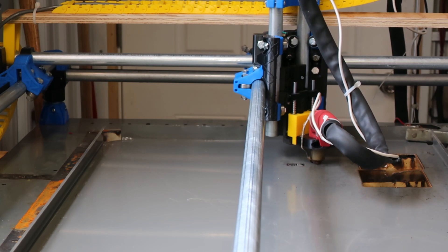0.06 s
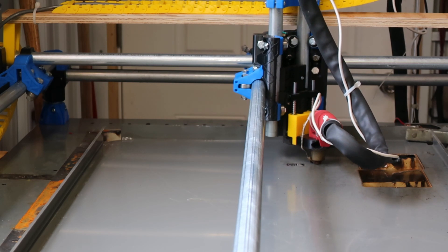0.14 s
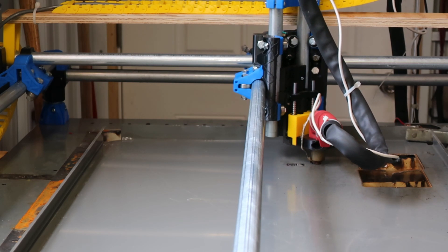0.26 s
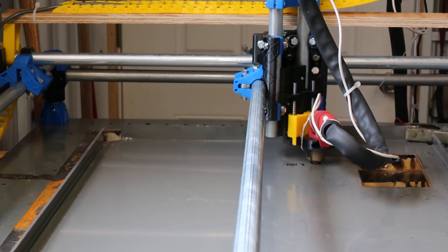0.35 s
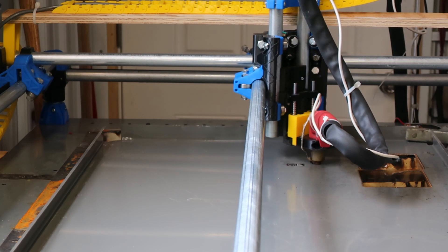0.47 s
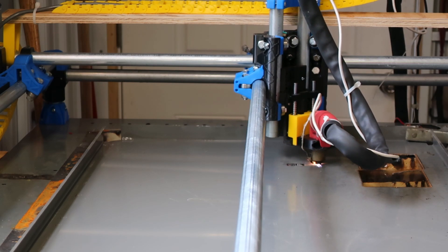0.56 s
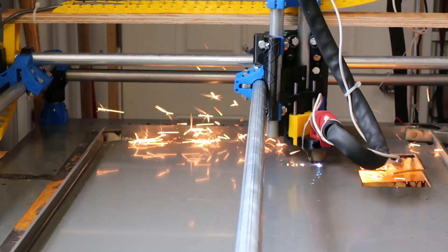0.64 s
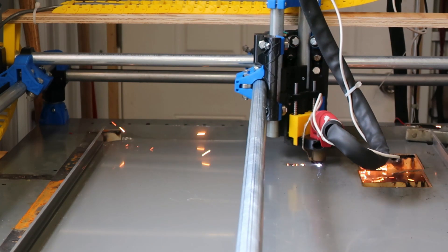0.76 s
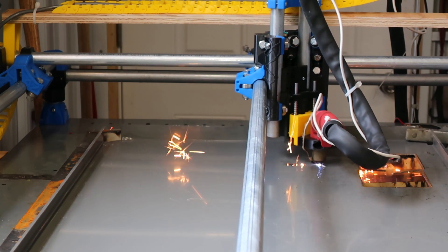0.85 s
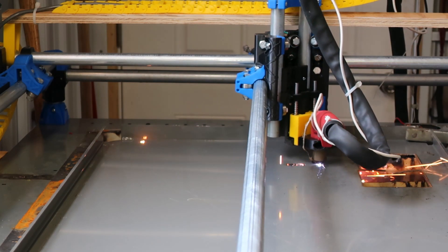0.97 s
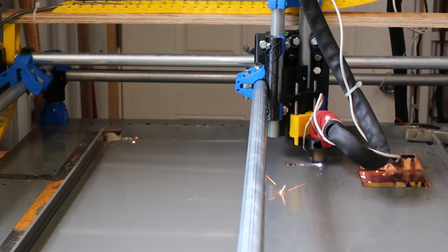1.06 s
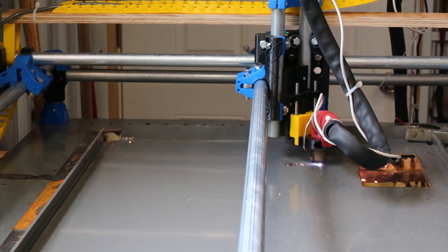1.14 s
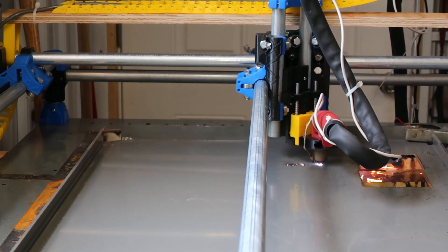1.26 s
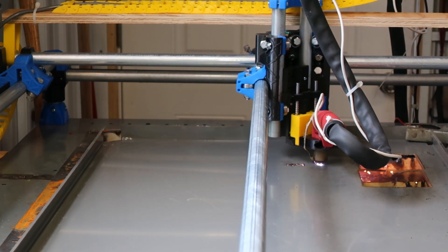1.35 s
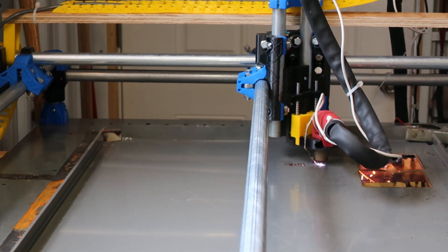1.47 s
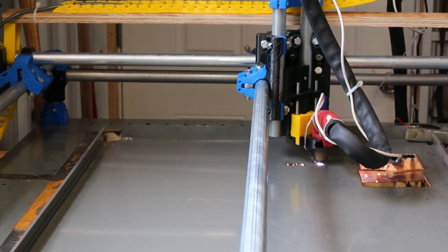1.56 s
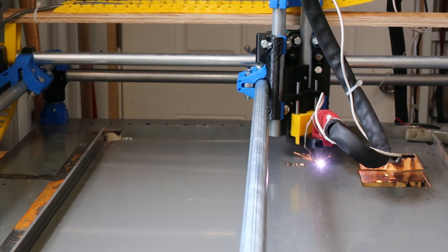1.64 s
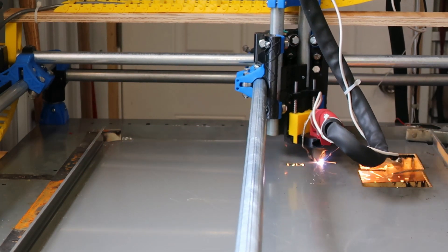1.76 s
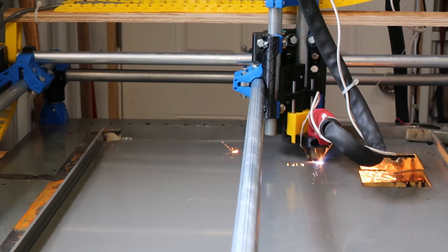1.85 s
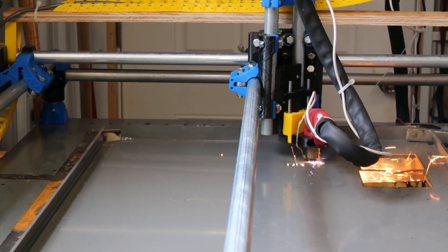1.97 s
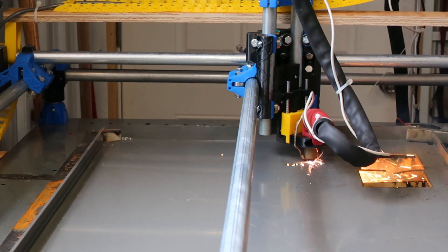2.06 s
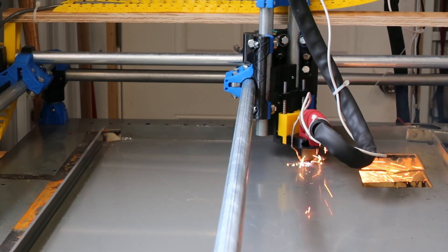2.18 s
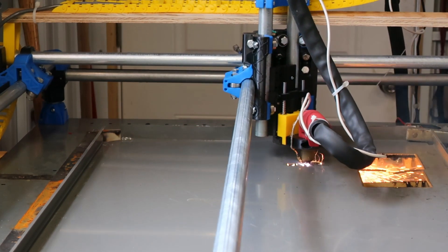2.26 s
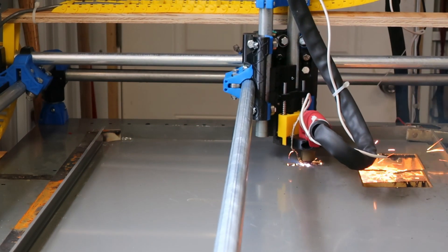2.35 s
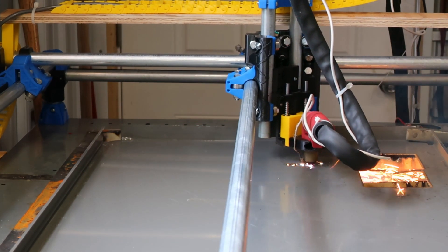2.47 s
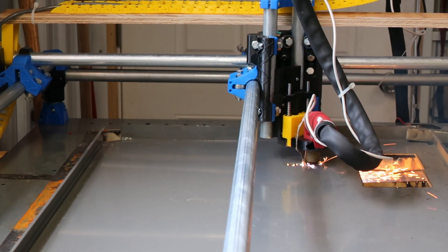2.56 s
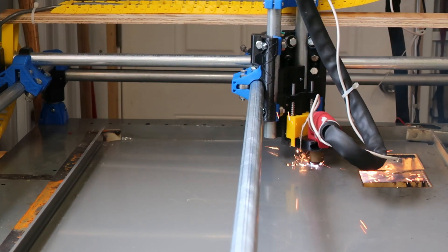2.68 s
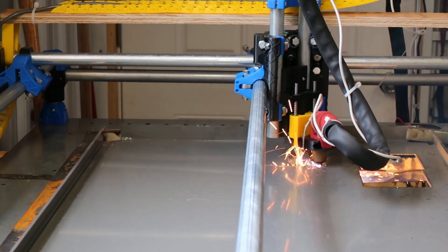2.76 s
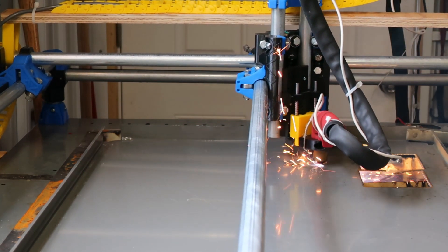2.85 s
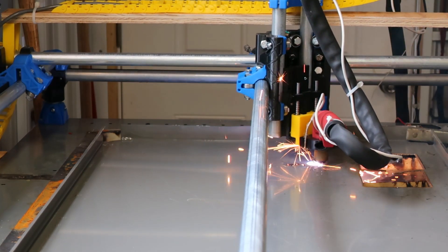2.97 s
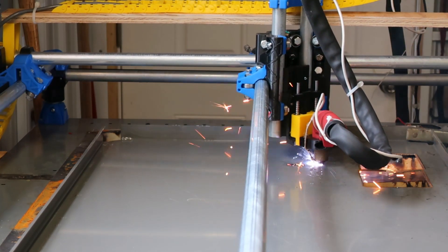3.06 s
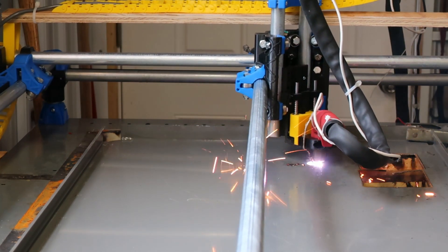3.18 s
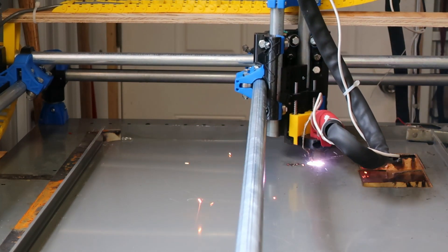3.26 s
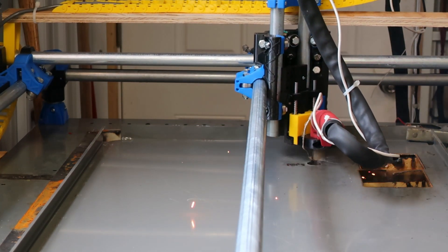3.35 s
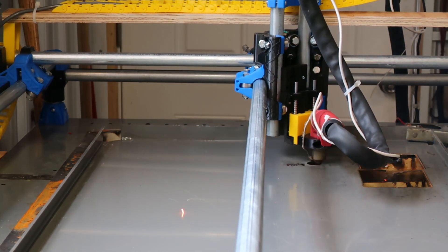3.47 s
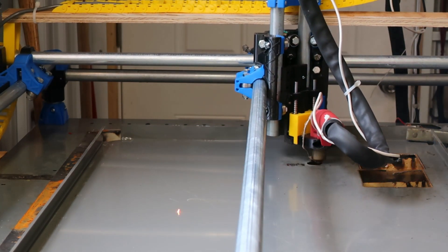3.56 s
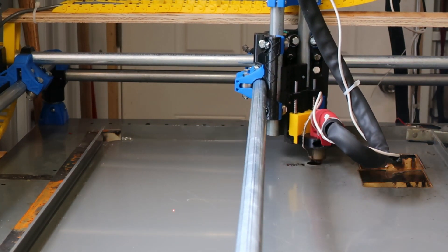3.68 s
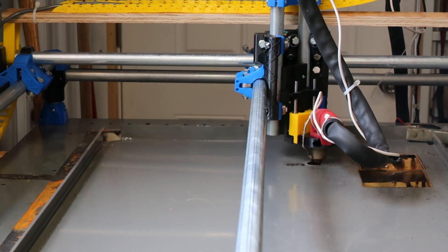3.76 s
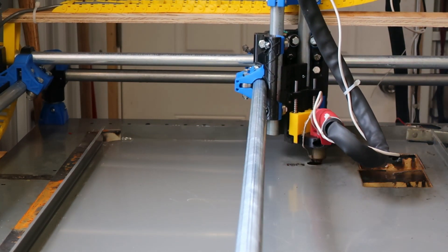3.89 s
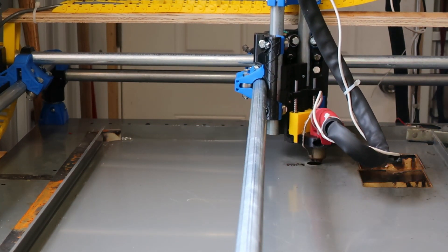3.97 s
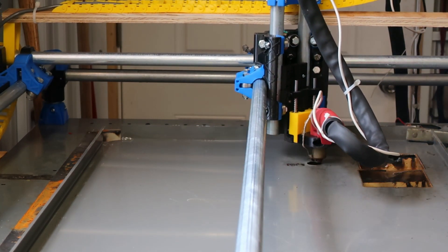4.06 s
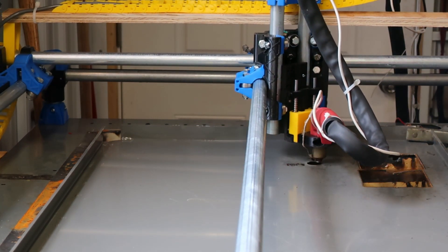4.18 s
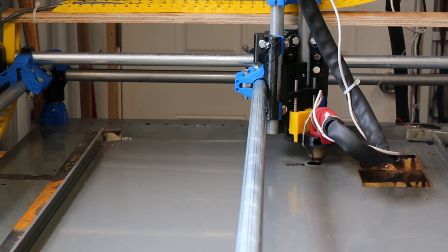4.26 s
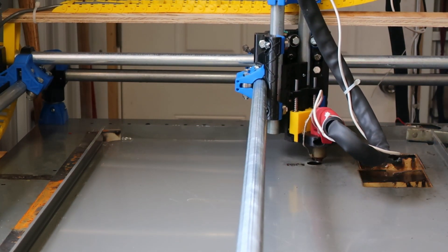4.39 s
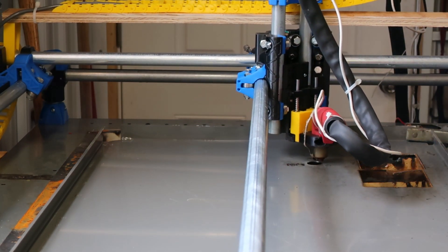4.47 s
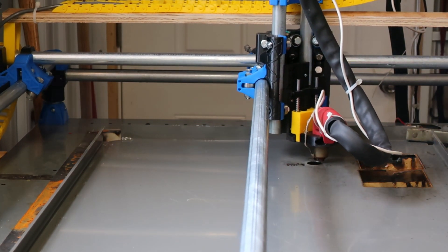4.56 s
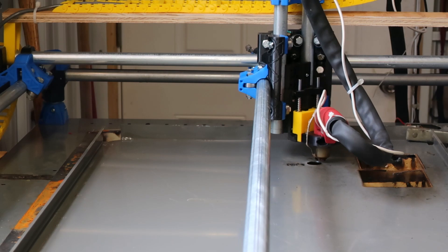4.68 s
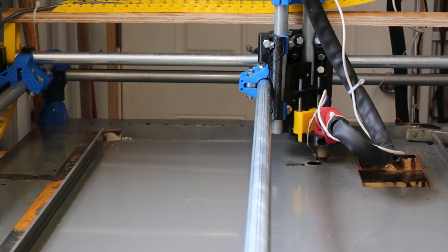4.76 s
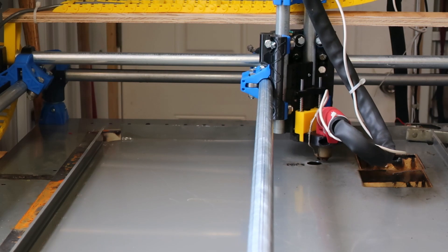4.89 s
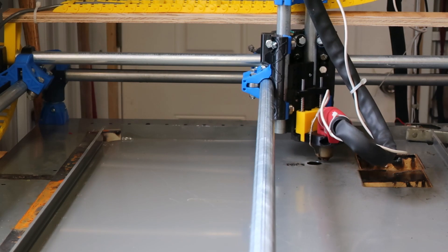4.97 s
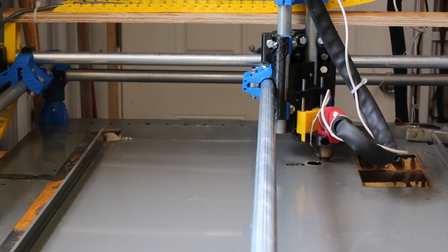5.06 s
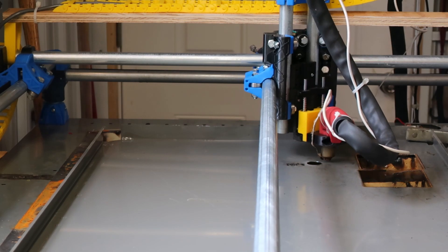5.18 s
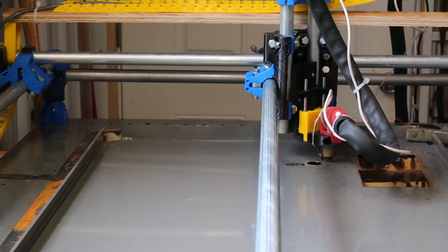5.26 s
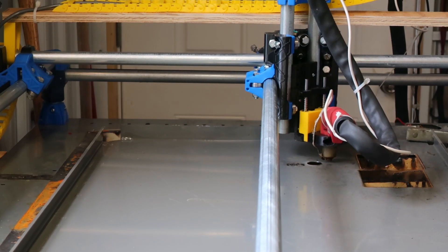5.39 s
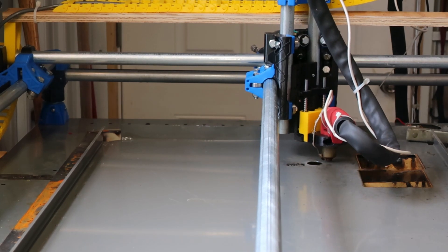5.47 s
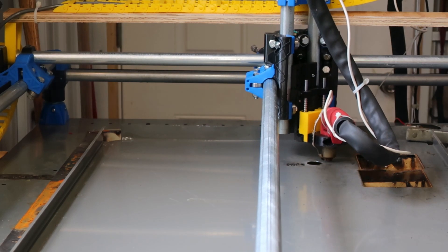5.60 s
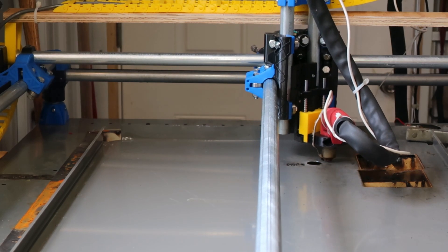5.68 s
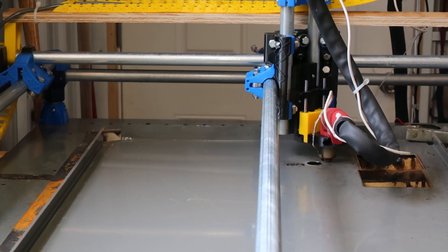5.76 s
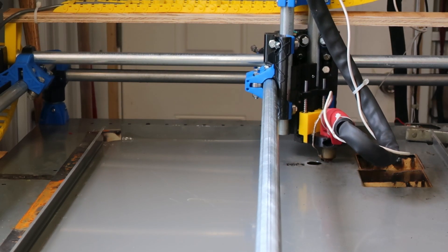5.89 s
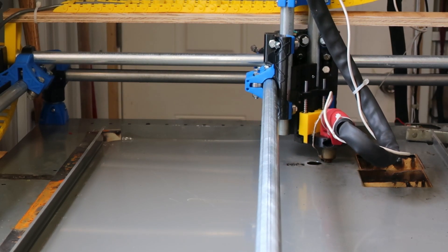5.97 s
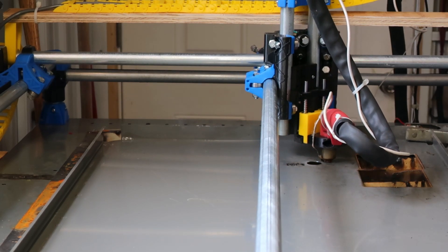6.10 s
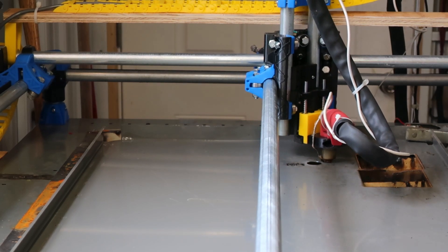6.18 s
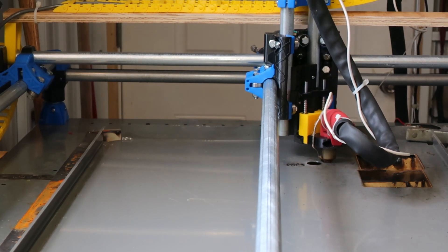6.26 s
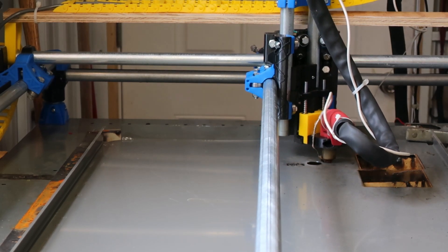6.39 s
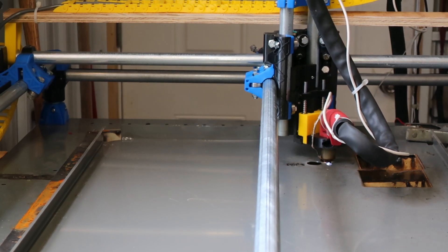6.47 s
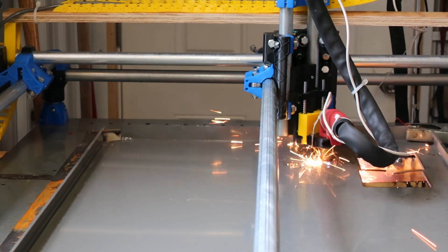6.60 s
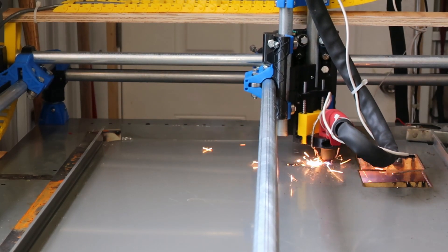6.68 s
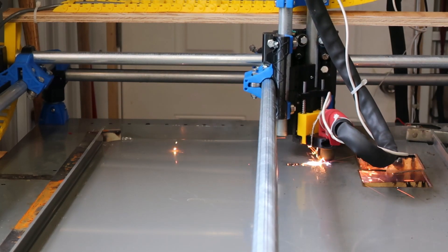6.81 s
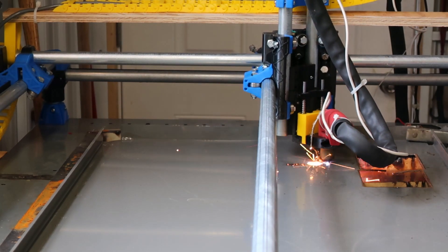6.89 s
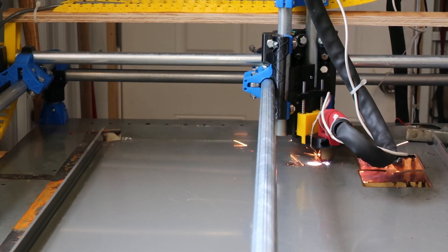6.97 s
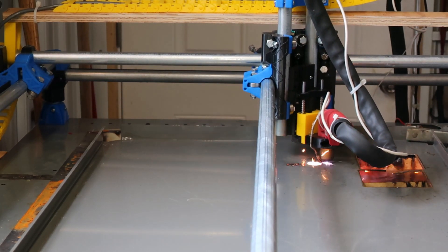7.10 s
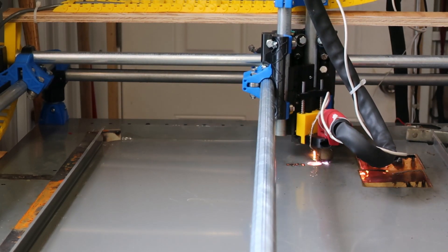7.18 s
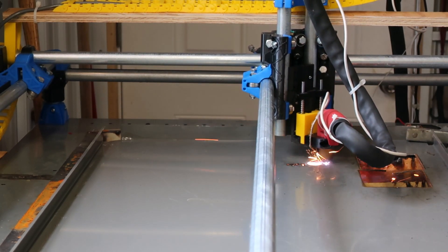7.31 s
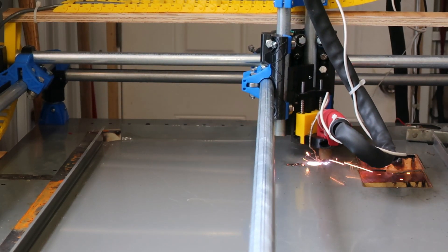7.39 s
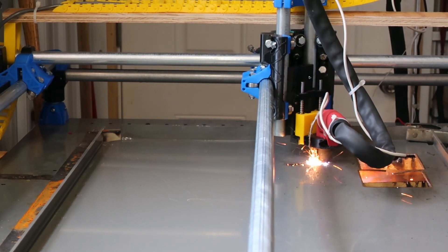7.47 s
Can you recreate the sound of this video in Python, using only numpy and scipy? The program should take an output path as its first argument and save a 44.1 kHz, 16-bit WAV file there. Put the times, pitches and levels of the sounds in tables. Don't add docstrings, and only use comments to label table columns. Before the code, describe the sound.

Close stereo pickup, about a metre from a plasma cutter over a metal tray. First comes airy hiss with a faint whistle, then a ticking spark burst and a loud, wide, uneven roar that rattles the sheet and sprays fizzing metal. The arc cuts out suddenly, leaving subdued air that gradually grows louder with shifting whistles and low sheet rumble. Another strike brings a second, shorter roar. Small room, little bass.

```python
import sys
import numpy as np
from scipy import signal
from scipy.fft import rfft, irfft, next_fast_len
from scipy.io import wavfile
from scipy.ndimage import uniform_filter1d

SR = 44100
rng = np.random.default_rng(int(sys.argv[2]) if len(sys.argv) > 2 else 0)


def dump_mix(stems):
    frames = np.atleast_2d(stems).T
    limited = np.clip(frames, -1, 1)
    pcm = np.round(limited * 32767).astype(np.int16)
    wavfile.write(sys.argv[1], SR, pcm)


def attenuation_scalar(level_db):
    decades = np.asarray(level_db, float) / 20
    return 10 ** decades


N = 332514
HOP = 128

# frequency [Hz], level [dB per Hz].
SHOP_SPECTRUM = [(50, -40), (100, -49), (200, -13), (330, -7.5), (450, -2), (600, -6), (800, -5.5),
                 (1300, -4.5), (1900, -42.5)]
# frequency [Hz], level [dB per Hz].
SHEET_SPECTRUM = [(50, -62), (100, -77), (200, -20.5), (330, -7.5), (400, -6), (560, -5), (700, -6),
                  (1030, -4.5), (1400, -8), (1900, -25)]
# frequency [Hz], level [dB per Hz].
SPRAY_SPECTRUM = [(2600, -30), (3300, 0.5), (3700, 2), (4200, -1), (4700, -0.5), (5400, -1.5),
                  (6500, -10.5), (8000, -17)]
# frequency [Hz], level [dB per Hz].
HISS_SPECTRUM = [(3500, -14.5), (6000, -1.5), (8700, -1.5), (12700, -1), (14000, -5.5), (15000, -1.5),
                 (15500, -10), (15900, -30)]
# frequency [Hz], side minus mid [dB].
PORT_DIFFERENCE = [(60, -10), (130, -23), (300, -19.5), (1300, -21.5), (2400, -16), (3500, -10.5),
                   (4700, -5), (6500, -1), (9000, 2.5), (10000, 5), (11500, 3), (13000, 7.5), (14500, 1),
                   (15700, 5)]
# frequency [Hz], width [Hz], lift [dB].
TRAY_MODES = [(248, 31, 4), (388, 85, 6.5), (484, 16, 3), (570, 50, -2), (680, 45, 7), (733, 21, 6.5),
              (791, 27, 1.5), (863, 30, 7), (910, 17, 6), (962, 25, -3), (1031, 24, 5.5), (1058, 40, 3.5),
              (1114, 23, 1.5), (1148, 20, -3), (1170, 19, 3.5), (1215, 22, 2.5), (1265, 60, 5.5),
              (1346, 54, 3.5), (1410, 35, -2.5), (1502, 18, 5.5), (1558, 42, 6), (1605, 23, 3),
              (1760, 70, 3.5), (1847, 26, 2.5), (1895, 26, 2.5), (2000, 50, -2.5), (2089, 35, 5),
              (2168, 25, 4.5), (2234, 50, 5), (2326, 28, 1), (2422, 29, 1), (2471, 42, 5), (2536, 17, 2),
              (2638, 29, 4), (2778, 27, 3.5), (2895, 55, 4), (3052, 28, 2), (3122, 36, 3), (3187, 44, 2),
              (3316, 33, 1.5), (3478, 60, 2.5), (3635, 35, 2), (4095, 50, 1.5), (4689, 52, 2.5),
              (5440, 60, 2.5), (5905, 70, 2), (6089, 58, 3)]
# frequency [Hz], width [Hz], lift in air alone [dB],
# lift with the arc lit [dB].
JET_RIDGES = [(1490, 160, 0, -2), (2200, 1100, 0.5, -3), (3220, 140, 2.5, -4), (3520, 200, -0.5, -3.5),
              (4210, 400, 2.5, 1.5), (5050, 590, 1, -1), (7800, 220, 1.5, -1), (9730, 210, 9, 4),
              (10400, 170, -0.5, 3), (12550, 110, -1.5, 4.5), (13900, 300, -2, 1)]
# strike [s], snap-off [s].
ARC_ON = [
    (.648, 3.44),
    (6.578, 7.6),
]
# start [s], peak [dB], pitch [Hz].
STRIKE_SPARKS = [
    (.6482, -10, 4400),
    (.6519, -15, 3300),
    (.6562, -15, 2400),
    (.6603, -18, 3200),
    (.6637, -20, 2600),
    (.6681, -18, 1900),
    (.6738, -18, 3000),
    (.6752, -19, 3100),
]
# start [s], peak [dB], pitch [Hz].
RESTRIKE_SPARKS = [
    (6.5797, -14, 4200),
    (6.5886, -12, 3600),
    (6.593, -17, 2300),
    (6.597, -17, 1500),
    (6.6057, -17, 2200),
    (6.6158, -17, 3300),
    (6.617, -13, 4300),
]
# start [s], peak [dB], pitch [Hz], ring time [s].
BLOW_THROUGHS = [(.98, -20, 723, 0.023), (.986, -17, 900, .008), (1.048, -17, 960, 0.0055),
                 (1.061, -13, 1100, 0.006), (.974, -17, 1265, .012), (1.004, -19, 950, .01),
                 (1.02, -19, 1250, .006), (.912, -21, 735, .015), (1.093, -21, 2500, .006),
                 (1.045, -21, 2950, .004), (1.082, -14, 1200, 0.006), (1.105, -16, 1060, 0.006),
                 (1.122, -21, 2460, 0.013), (1.26, -27.5, 389, 0.025), (1.466, -32, 396, 0.038),
                 (1.544, -33, 386, 0.04), (1.596, -23, 384, 0.012), (1.745, -27.5, 402, 0.042),
                 (3.334, -14.5, 1047, .006), (3.432, -21, 694, 0.0075), (3.429, -19, 1050, .007),
                 (6.755, -19, 1520, .012), (7.15, -20, 1200, .008), (7.195, -21, 1260, .01),
                 (3.433, -23, 380, 0.009), (6.597, -23.5, 865, 0.022), (6.577, -21, 2450, .006),
                 (6.589, -19, 2450, .006), (6.604, -19, 2150, .006), (6.647, -22, 2200, .006),
                 (6.63, -23, 3250, .005), (6.619, -22, 3400, .004), (6.6, -38, 253, 0.032),
                 (7.16, -19, 1157, 0.013), (7.4, -22, 1033, 0.022), (7.467, -18, 1093, 0.0092)]
# time [s], level over the hiss [dB].
SLOT_SINGING = [(.7, -8), (.95, 4), (1.6, 6), (1.75, -6), (2.95, -3.5), (3.1, 4), (3.43, 6), (3.46, -12),
                (6.8, -13), (6.95, -1), (7.54, 2)]
# time [s], jet striking the sheet over the hiss [dB],
# gap resonance [Hz].
NOZZLE_GAP = [(0, -4, 3030), (.366, -8.5, 2760), (.63, -9.5, 3000), (3.6, 0.5, 2160), (3.95, 2.5, 2240),
              (4.36, 4.5, 2220), (4.71, 6.8, 2140), (5.03, 0.5, 2500), (5.24, -1.6, 2750),
              (5.8, -2.5, 2900), (6.0, -3, 2740), (6.24, -8.5, 2840), (6.44, -10, 2850), (6.57, -7.5, 3000)]
# time [s], kerf resonance [Hz], spatter over the roar [dB],
# sheet shake over the roar [dB].
CUTS = [
    [(.66, 2400, -2.5, -5), (.87, 2280, -4, -3.5), (1.02, 1740, -6.5, -5.5), (1.2, 2200, -6.5, -0.5),
     (1.4, 1900, -9, -4), (1.8, 2250, -12.5, -3.5), (2.3, 2180, -6.5, -6), (2.9, 1880, -4, -6),
     (3.04, 2800, -5.5, -8.5)],
    [(3.27, 1720, -4.5, -3), (3.5, 1680, -8.5, -3)],
    [(6.6, 2370, 0, -4), (6.75, 1950, -7, 0.5), (6.95, 1980, -5.5, -4), (7.06, 1600, -7.5, -7),
     (7.3, 2000, -8.5, -3), (7.54, 1470, -11.5, -7)],
]
# centre [s], half length [s], roar [dB], sheet shake [dB].
MELT_SURGES = [(0.807, 0.047, 2, 1.5), (0.698, 0.035, -4, 1.5), (0.917, .015, 0.5, 6),
               (0.992, 0.01, 0.5, 13.5), (1.025, 0.018, -5, 3.5), (1.108, 0.021, 1.5, 1.5),
               (1.217, 0.01, 0, -6), (1.26, 0.029, -0.5, 2.5), (1.394, 0.035, 2.5, 3),
               (1.474, 0.027, 3, 4.5), (1.525, 0.014, -1.5, -5), (1.606, 0.038, 3, 4),
               (1.653, 0.014, -2.5, 5), (7.244, 0.01, -5, -2), (1.944, 0.031, -3.5, -2),
               (2.05, 0.075, 3, 0.8), (2.345, 0.037, -1, 2), (2.587, 0.066, 3.5, 3.5),
               (2.944, 0.042, -3.5, 1.5), (3.067, 0.09, 4.5, 2), (3.39, 0.023, 3, -1.5),
               (3.444, .007, 0, 8), (6.674, 0.032, -3.5, -4.5), (6.762, 0.065, 5, -4), (6.89, 0.024, -1, 2),
               (6.972, 0.034, 4, 1), (7.145, 0.077, 3, 2.5), (7.355, 0.043, 3.5, -0.2),
               (7.418, 0.012, 3, 1.5), (7.503, 0.032, 1, 3), (6.584, .003, -6, -6), (6.611, .004, -4, 0),
               (6.64, .012, -2.5, -3), (1.078, .004, 0, -6), (1.775, .03, -2, 0), (.97, .015, 2, 0),
               (3.36, .05, 1.5, 0), (7.12, .05, -1.5, -1)]
# centre [s], half length [s], frequency [Hz],
# width [Hz], change [dB].
GAP_SINGING = [(0.8, 0.027, 2200, 500, 7), (1.028, 0.02, 3300, 1800, -9), (1.07, .012, 3600, 1200, -4),
               (1.63, .03, 2100, 300, -4), (1.4, .05, 1050, 400, 3), (6.6, .015, 3500, 2500, -4),
               (.67, .015, 3200, 600, 4), (6.695, .012, 2400, 900, -4), (1.463, 0.019, 2440, 400, 8),
               (2.87, 0.14, 3020, 460, 4.5), (4.2, 0.47, 3460, 140, 6), (5, 0.44, 2200, 200, 2),
               (0.92, 0.25, 4240, 170, 3.5), (1.0, 0.22, 2400, 250, 1.5), (1.6, 0.18, 3000, 410, 2),
               (5.7, 0.4, 2950, 170, 4), (6.1, 0.35, 5430, 150, 3), (5, 0.65, 1670, 140, 3),
               (1.7, .12, 2600, 500, 2), (3.03, .08, 1900, 500, 2), (2.7, 0.046, 4000, 550, 3),
               (3, 0.088, 4200, 700, 2), (7.37, 0.062, 2770, 510, 3), (7.1, .08, 3000, 800, 1.5),
               (1.005, .03, 1150, 500, 4), (7.15, .1, 4200, 1500, 3), (7.49, 0.034, 1550, 400, -3),
               (1.72, 0.036, 2900, 810, -2), (2.23, .1, 2950, 600, 2), (3.2, .08, 1240, 340, 2.5),
               (4.9, 0.9, 380, 130, -2.5), (5.4, 0.18, 220, 230, 5), (1.64, 0.032, 2300, 300, -2.5),
               (7.33, 0.065, 1900, 610, 2.5), (6.67, 0.027, 7400, 2600, -5), (.75, .1, 3200, 800, 2.5),
               (5.7, 0.23, 4200, 110, 2), (2.7, 0.12, 1750, 330, 2.5), (3.05, .04, 3400, 700, -3.5)]
# centre [s], half length [s], frequency [Hz],
# width [Hz], level [dB rms].
NARROW_WHISTLES = [(.68, .03, 1615, 25, -42), (.87, .1, 4230, 40, -43), (1.17, .08, 4210, 40, -46),
                   (1.62, .15, 4200, 50, -51), (.83, .05, 2640, 40, -42), (.82, .04, 2250, 40, -42),
                   (4.2, .2, 3480, 40, -51), (4.3, .15, 1620, 50, -50), (4.0, .12, 2220, 50, -54),
                   (4.15, .12, 2640, 30, -54), (1.8, .06, 2870, 40, -44), (1.55, .05, 2900, 50, -44),
                   (4.45, .1, 2480, 40, -48), (4.55, .12, 2170, 50, -45), (4.6, .12, 3470, 30, -49),
                   (4.7, .15, 1610, 50, -46), (4.77, .05, 2400, 40, -43), (4.88, .1, 2120, 50, -43),
                   (4.9, .08, 2900, 40, -46), (5.25, .08, 3120, 40, -44), (5.5, .1, 2940, 40, -46),
                   (5.68, .05, 2880, 50, -42), (5.83, .08, 2990, 50, -43), (5.75, .15, 4100, 45, -48),
                   (5.9, .08, 5420, 45, -47), (6.12, .06, 3000, 50, -46), (6.3, .25, 5500, 60, -51),
                   (2.08, .06, 2230, 40, -41), (2.05, .04, 1750, 40, -42), (2.2, .07, 2880, 50, -43),
                   (2.58, .07, 1760, 40, -41), (2.82, .08, 1860, 40, -41), (2.62, .05, 2900, 40, -43),
                   (3.02, .04, 2890, 40, -40), (6.74, .025, 2090, 40, -38), (6.97, .015, 2850, 60, -39),
                   (7.0, .03, 1780, 50, -38), (7.3, .03, 2090, 40, -40), (7.4, .03, 2770, 40, -41),
                   (7.37, .04, 1850, 60, -39)]
# sheet, kerf, spray, hiss [dB per s].
SNAP_FADES = (125, 145, 250, 900)

ROOM_T60_S, ROOM_DB = 0.28, -7
AIR_DB, ROAR_DB = -31, -32
DUCKED_DB, RECOVERS_S, RECOVERY_DB_PER_S = -20.5, 3.56, 10.5
FLASH_DB, FLASH_S = 9.5, 0.0042
SNAP_DB = -4
WARM_SHEET_DB, COOLS_S = 7, 1
TRAY_DEPTH, TRAY_SHARP = 1.55, .75


def lines(table, hz):
    table = np.array(table)
    return np.interp(np.log(np.maximum(hz, 1)), np.log(table[:, 0]), table[:, 1])


def over_time(table, s):
    times, *columns = np.transpose(table)
    return [np.interp(s, times, column) for column in columns]


def bump(hz, centre_hz, width_hz):
    return 1 / (1 + (2 * (hz - centre_hz) / width_hz) ** 2)


def swell(s, centre_s, half_s):
    return np.exp(-.5 * ((s - centre_s) / half_s) ** 2)


def patches(shape, frames, bins):
    field = rng.standard_normal(shape)
    for _ in range(2):
        field = uniform_filter1d(field, max(int(bins), 1), axis=0)
        field = uniform_filter1d(field, max(int(frames), 1), axis=1)
    return field / field.std()


def turbulence(noise, gain):
    frames = signal.stft(noise, nperseg=4 * HOP, noverlap=3 * HOP)[2]
    return signal.istft(frames * gain, nperseg=4 * HOP, noverlap=3 * HOP)[1][:N]


def power(shape_db, level_db):
    shape = attenuation_scalar(shape_db) ** 2
    return shape / shape.mean(axis=0) * attenuation_scalar(level_db) ** 2


def filtered(x, gain):
    cepstrum = irfft(np.log(gain))
    half = len(cepstrum) // 2
    cepstrum[1:half] *= 2
    cepstrum[half + 1:] = 0
    return signal.fftconvolve(x, irfft(np.exp(rfft(cepstrum))))[:N]


def room(x, wet_db, t60_s, even=0):
    t = np.arange(int(.4 * SR)) / SR
    tail = rng.standard_normal(len(t)) * np.exp(-np.log(1000) * t / t60_s) * (t > .001)
    echo = attenuation_scalar(wet_db) * tail / np.sqrt(np.sum(tail ** 2)) + (t == 0)
    echo = echo / np.sqrt(np.sum(echo ** 2))
    colour = uniform_filter1d(np.abs(rfft(echo, 8 * 4096)) ** 2, size=45)[::4]
    return filtered(signal.fftconvolve(x, echo)[:N], colour ** (-even / 2))


def tray(x):
    hz = np.arange(4097) * SR / 8192
    lift_db = sum(db * bump(hz, f, TRAY_SHARP * w) for f, w, db in TRAY_MODES)
    gain = attenuation_scalar(TRAY_DEPTH * lift_db)
    return filtered(x, gain / np.sqrt(uniform_filter1d(gain ** 2, size=70)))


def narrow_whistles():
    out, t = np.zeros(N), np.arange(N) / SR
    for at, half, hz, width_hz, db in NARROW_WHISTLES:
        near = np.abs(t - at) < 3 * half
        smooth = [1, -np.exp(-np.pi * width_hz / SR)]
        wobble = signal.lfilter([1], smooth, rng.standard_normal((2, N // 4)))[:, :near.sum()]
        phase = 2 * np.pi * hz * t[near]
        tone = wobble[0] * np.cos(phase) + wobble[1] * np.sin(phase)
        out[near] += attenuation_scalar(db) * tone / tone.std() * swell(t[near], at, half)
    return out


def spits():
    out, t = np.zeros(N), np.arange(6000) / SR
    for s, db, hz in STRIKE_SPARKS + RESTRIKE_SPARKS:
        start = int(s * SR)
        out[start:start + len(t)] += attenuation_scalar(db + 2) * np.sin(2 * np.pi * hz * t) * np.exp(-t * hz / 1.1)
    for s, db, hz, ring_s in BLOW_THROUGHS:
        piece = out[int(s * SR):int(s * SR) + len(t)]
        ring = attenuation_scalar(db) * np.sin(2 * np.pi * hz * t) * np.exp(-t / ring_s)
        piece += (ring * (1 - np.exp(-t / 0.0037)))[:len(piece)]
    return out


def idle_air(s, strike_db):
    after = s > ARC_ON[0][1]
    since = np.maximum(s - RECOVERS_S, 0)
    hiss_db = AIR_DB + after * np.minimum(DUCKED_DB + RECOVERY_DB_PER_S * since, 0)
    spray_db = np.minimum(-2.0 + 0.82 * strike_db, .3)
    air_db = hiss_db + np.array([-13 + 0.83 * strike_db, strike_db, spray_db, 0 * s])
    air_db[0] += after * WARM_SHEET_DB * np.exp(-since / COOLS_S)
    return air_db


def arc_life(s):
    burning, dying = 0, 0
    for on, off in ARC_ON:
        flash_db = FLASH_DB * np.exp(-np.maximum(s - on, 0) / FLASH_S)
        burning = burning + ((s > on) & (s < off)) * attenuation_scalar(flash_db)
        fade_db = np.array(SNAP_FADES)[:, None] * np.maximum(s - off, 0)
        dying = dying + (s >= off) * attenuation_scalar(SNAP_DB - fade_db)
    return burning, dying


def layers(s):
    strike_db, gap_hz = over_time(NOZZLE_GAP, s)
    slot_hz, spatter_db, shake_db = over_time(np.concatenate(CUTS), s)
    roar_db = sum(roar * swell(s, at, half) for at, half, roar, _ in MELT_SURGES)
    knock_db = sum(knock * swell(s, at, half) for at, half, _, knock in MELT_SURGES)
    arc_db = ROAR_DB + np.array([shake_db + knock_db, roar_db,
                                 spatter_db + 0.24 * roar_db - 0.2 * knock_db - .6,
                                 spatter_db + 0.36 * roar_db - 0.054 * knock_db])
    burning, dying = arc_life(s)
    air_power = (burning == 0) * attenuation_scalar(idle_air(s, strike_db)) ** 2
    level_db = 10 * np.log10(air_power + (attenuation_scalar(arc_db) * (burning + dying)) ** 2)
    hot = (burning > 0) | (dying[1] > .15)
    idle_sheet_hz = np.clip(883 + 32 * strike_db, 500, 1050)
    sheet_hz = np.where(hot, 885 - 30 * shake_db - 9 * knock_db, idle_sheet_hz)
    return level_db, np.where(hot, slot_hz, gap_hz), sheet_hz


def torch():
    hz = np.arange(2 * HOP + 1)[:, None] * SR / (4 * HOP)
    s = np.arange(-(-N // HOP) + 1) * HOP / SR
    (sheet_db, kerf_db, spray_db, hiss_db), kerf_hz, sheet_hz = layers(s)
    arc = sum((s > on) & (s < off) for on, off in ARC_ON)
    sheet = np.where(arc, lines(SHEET_SPECTRUM, hz), lines(SHOP_SPECTRUM, hz))
    sheet = sheet + 11.7 * bump(hz, sheet_hz, 1.39 * sheet_hz)
    octaves = np.log2(np.maximum(hz, 1) / kerf_hz)
    kerf = -10 * np.log10(1 + (octaves / (0.44 + 0.04 * arc)) ** 2)
    kerf = kerf + (0.55 + 0.5 * arc) * bump(hz, kerf_hz, 430)
    kerf = kerf + lines([(900, -22.5), (1300, -1.0), (3000, -2.0), (3400, -3.0), (4500, -12.0)], hz)
    hiss = lines(HISS_SPECTRUM, hz) + arc * lines([(12000, -1), (14000, -5.5), (15200, -11)], hz)
    hiss = hiss + over_time(SLOT_SINGING, s)[0] * bump(hz, 9720, 340)
    ridges_db = sum(np.where(arc, arc_db, air_db) * bump(hz, f, w) for f, w, air_db, arc_db in JET_RIDGES)
    ridges_db = ridges_db * (1 + .45 * patches(ridges_db.shape, 59, 12))
    total = power(sheet, sheet_db + .5) + power(kerf + ridges_db, kerf_db + 0.89)
    total = total + power(lines(SPRAY_SPECTRUM, hz) + ridges_db, spray_db + .1)
    total = total + power(hiss + ridges_db, hiss_db + 0.059)
    surge_db = (.8 + .7 * arc) * patches(total.shape, 22, 2)
    surge_db = surge_db + (.5 + 0.37 * arc) * patches(total.shape, 3.7, 26)
    surge_db = surge_db + 1.25 * arc * np.clip(hz / 5000, 0, 1) * patches(total.shape, 7.1, 120)
    surge_db = surge_db + sum(db * bump(hz, f, w) * swell(s, at, half) for at, half, f, w, db in GAP_SINGING)
    mid = np.sqrt(total) * attenuation_scalar(surge_db)
    wander_db = 4.5 * (hz < 1600) * patches((1, len(s)), 24, 1)
    wide_db = arc * lines([(1500, -3.0), (2600, 3.0), (4500, 1.0)], hz)
    return mid, mid * attenuation_scalar(wander_db + lines(PORT_DIFFERENCE, hz) + wide_db)


def scene():
    mid_gain, side_gain = torch()
    jet, other = rng.standard_normal((2, N))
    mid = tray(turbulence(jet, mid_gain))
    bass = signal.sosfiltfilt(signal.butter(2, 3600, fs=SR, output="sos"), mid)
    treble = room(mid - bass, -11, 0.03, .3)
    mid = room(bass + treble + spits(), ROOM_DB, ROOM_T60_S, 1) + narrow_whistles()
    quarter = np.imag(signal.hilbert(jet, next_fast_len(N))[:N])
    apart = np.sqrt(.25) * quarter + np.sqrt(.75) * other
    side = room(tray(turbulence(apart, side_gain)), -14, 0.055)
    side = room(side, ROOM_DB, ROOM_T60_S, 1)
    return np.array([mid + side, mid - side])


def low_pass(x):
    return signal.sosfilt(signal.butter(12, 15930, fs=SR, output="sos"), x)


def record(dry):
    thin = signal.sosfilt(signal.butter(4, 130, "high", fs=SR, output="sos"), dry)
    mix = signal.sosfilt(signal.cheby2(10, 40, 15600, fs=SR, output="sos"), thin)
    return low_pass(mix)


dry = scene()
out = record(dry)
dump_mix(out)
```